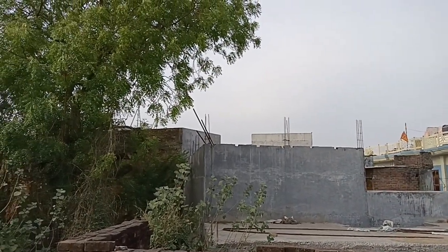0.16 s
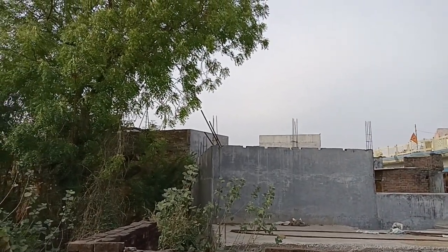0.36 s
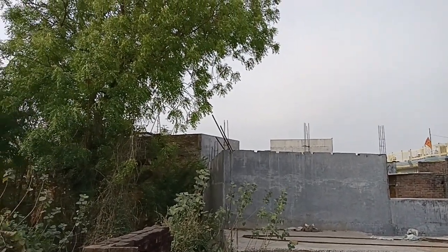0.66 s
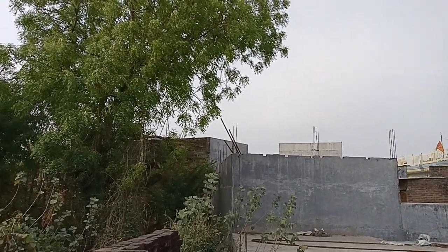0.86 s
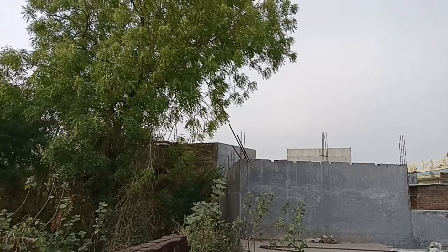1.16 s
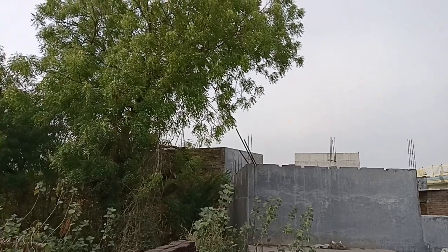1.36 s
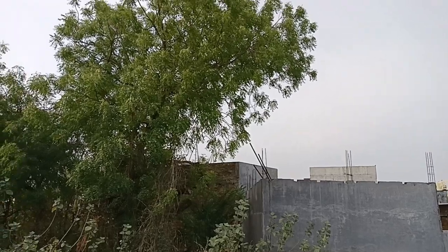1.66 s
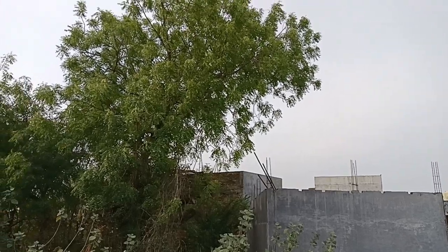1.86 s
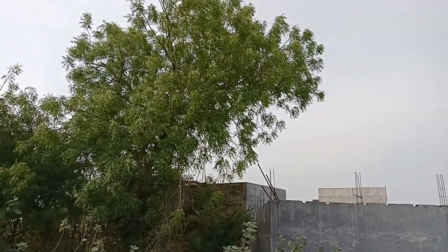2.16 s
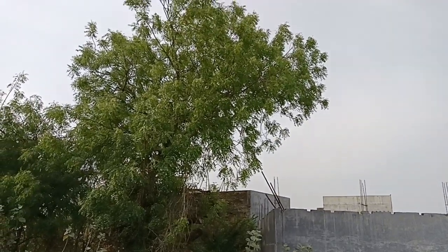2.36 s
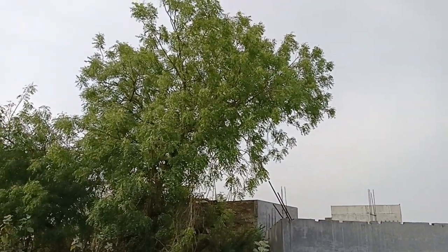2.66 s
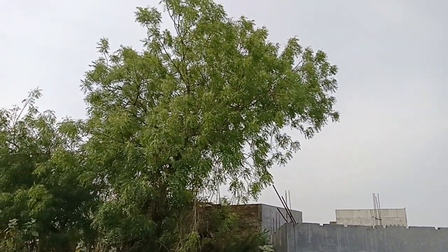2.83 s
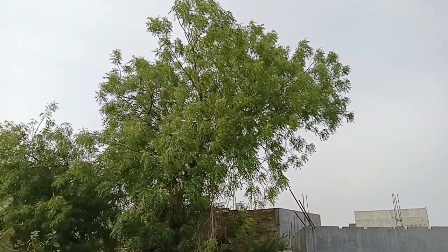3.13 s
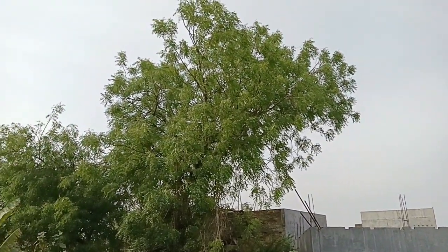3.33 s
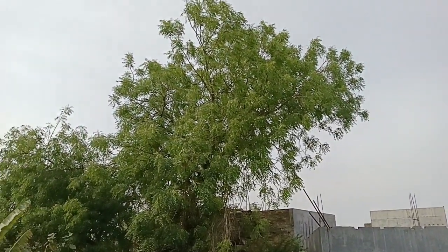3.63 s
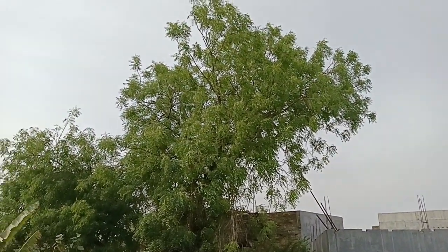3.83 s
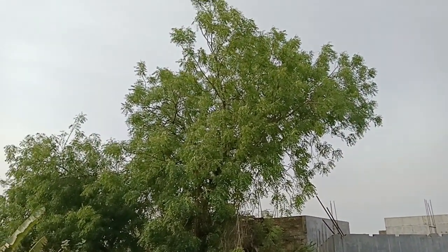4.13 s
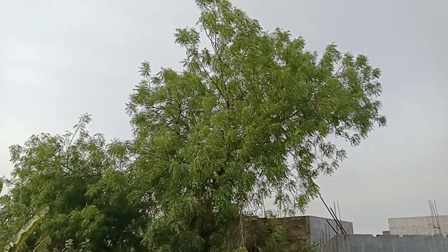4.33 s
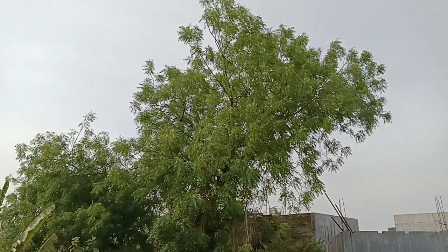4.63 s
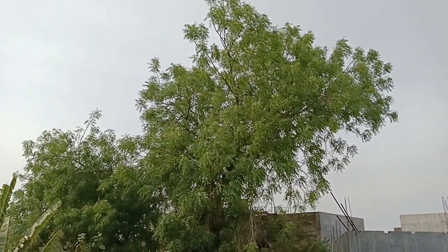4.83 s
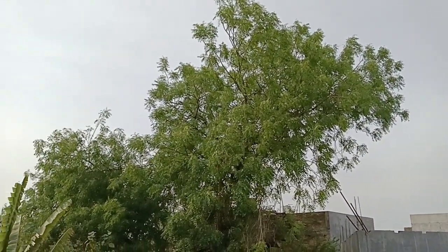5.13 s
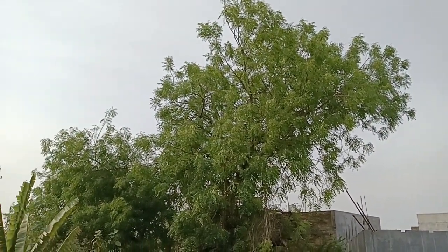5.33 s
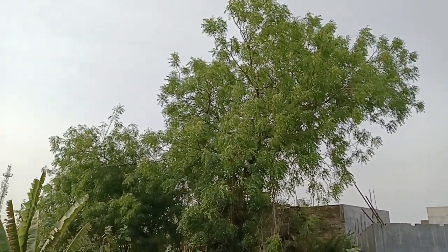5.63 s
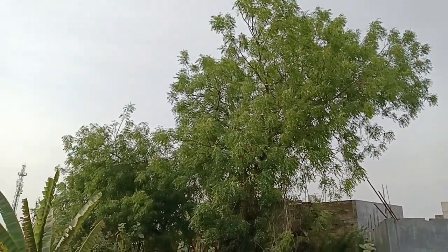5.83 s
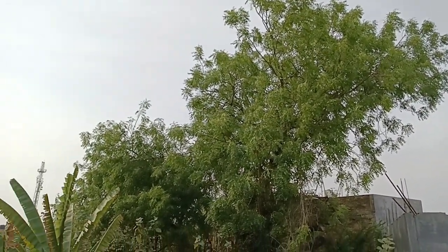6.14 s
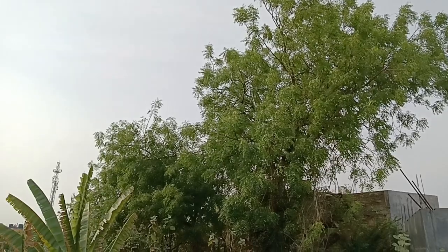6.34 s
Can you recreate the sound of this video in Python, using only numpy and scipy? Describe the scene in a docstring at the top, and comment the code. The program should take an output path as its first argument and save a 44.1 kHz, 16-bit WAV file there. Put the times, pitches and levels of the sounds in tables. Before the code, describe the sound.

A koel whistles four loud rising "ku-oo" calls from leafy trees among houses, while small birds chirp thinly and far horns buzz briefly.

```python
"""A tree among houses: a koel gives four loud "ku-oo" whistles after the end of an earlier one.
Its near-pure tone carries weak overtones shaped by the throat; leaves scatter it, walls throw it back.
Small birds chip, chirp and pipe thinly as swept or trilled tones; two vehicle horns buzz far off.
Under them lies a quiet town rumble of filtered noise, with soft low gusts and handling rubs at the
microphone, two faint hoots and a brief dry crackle of noise bursts."""
import sys
import numpy as np
from scipy import signal
from scipy.fft import rfft, irfft, next_fast_len
from scipy.io import wavfile
from scipy.ndimage import uniform_filter1d, map_coordinates

SR = 44100
rng = np.random.default_rng(int(sys.argv[2]) if len(sys.argv) > 2 else 0)


def output_pcm(signal):
    """Save a mono or channel-first signal as 16-bit PCM at the path in sys.argv[1].

    Samples are clipped to [-1, 1] before scaling.
    """
    pcm = np.clip(np.atleast_2d(signal).T, -1, 1) * 32767
    wavfile.write(sys.argv[1], SR, np.round(pcm).astype(np.int16))


N = 286246
LEAD = SR  # samples of run-up, so that earlier sounds still ring
TOTAL = next_fast_len(N + LEAD, True)


def gain_of(db):
    """Decibel law: level to amplitude ratio."""
    return 10 ** (np.asarray(db) / 20)


def evened(x):
    """Power normalisation: scales to rms 1."""
    return x / np.sqrt(np.mean(x ** 2) + 1e-20)


def read(points, hz):
    """Spectral interpolation on a log-frequency axis."""
    f, value = np.transpose(points)
    return np.interp(np.log(np.maximum(hz, 1e-3)), np.log(f), value)


def follow(rows, t):
    """Control-curve interpolation: each column at times t, with its corners rounded."""
    s, *columns = np.transpose(rows)
    return [uniform_filter1d(np.interp(t, s, c), size=400) for c in columns]


def wander(size, hz):
    """Band-limited random fluctuation: a smooth curve through hz unit-variance knots a second."""
    knots = rng.standard_normal(2048)
    return map_coordinates(knots, [np.arange(size) * hz / SR], order=3, mode="wrap")


def phase_of(hz):
    """Phase as the time integral of frequency."""
    return 2 * np.pi * np.cumsum(hz) / SR


def coloured(x, points):
    """Linear filtering by a magnitude spectrum."""
    hz = np.fft.rfftfreq(x.shape[-1], 1 / SR)
    return irfft(rfft(x) * gain_of(read(points, hz)), x.shape[-1])


def panned(lean_db):
    """Interaural level difference: left and right gains, positive to the left."""
    return gain_of(np.array([[.5], [-.5]]) * lean_db)


def from_right(x, lag_s=0.00046):
    """Interaural time difference: a source on the right reaches the left port later."""
    return np.array([np.roll(x, round(lag_s * SR)), x])


def add(mix, s, sound):
    """Superposition: mixes a sound in at time s."""
    part = mix[..., LEAD + round(s * SR):][..., :sound.shape[-1]]
    part += sound[..., :part.shape[-1]]


def foliage(x, spread_s=0.01):
    """Multiple scattering: leaves and branches give a short cluster of echoes, unlike at each port."""
    t = np.arange(SR // 12) / SR
    taps = rng.standard_normal((2, len(t))) * np.exp(-t / spread_s)
    # keeping only the phase smears the sound with little colouring
    flat = np.exp(1j * np.angle(rfft(taps, len(t) * 4)))
    return signal.fftconvolve(np.atleast_2d(x), irfft(flat)[:, :len(t)], axes=1)[:, :TOTAL]


# reverberation time of the yard, before each source's scaling: pitch_hz, t60_s
YARD_DECAY = [(400, .7), (1000, .85), (1500, 1.05), (3000, .68), (6000, .56), (12000, .45)]
# colour of the reverberation: pitch_hz, level_db
YARD_COLOUR = [(500, 0.5), (1400, 0.5), (3000, -1.5), (6000, 3.5), (12000, 1.5)]


def yard(x, longer=1.0, build_s=0.006):
    """Diffuse reverberation from leaves and houses: sparse taps, each band dying at its own speed."""
    size = SR * 3 // 2
    taps = rng.standard_normal((2, size)) * (rng.random((2, size)) < .1)
    hz, t, bands = signal.stft(taps, SR, nperseg=256)
    t60_s = longer * read(YARD_DECAY, hz)[:, None]
    fade = gain_of(-60 * t / t60_s) * (1 - np.exp(-t / build_s))
    fade /= np.sqrt((fade ** 2).mean(1, keepdims=True))
    shaped = bands * fade * gain_of(read(YARD_COLOUR, hz))[:, None]
    tail = signal.istft(shaped, SR, nperseg=256)[1] / np.linalg.norm(taps[0])
    return signal.fftconvolve(np.atleast_2d(x), tail, axes=1)[:, :TOTAL]


# spectrum of the town background: pitch_hz, relative level_db
TOWN_COLOUR = [(25, -26), (50, -7), (75, 0), (130, -0.5), (250, -2), (450, -7), (800, -11.5), (1500, -17),
               (2500, -14.5), (4000, -28), (6000, -30), (8000, -44), (15000, -44.5)]
# left-right likeness of the background: pitch_hz, correlation (share)
TOWN_LIKENESS = [(50, 0.85), (200, .93), (400, 0.76), (900, 0.33), (2000, 0.31), (8000, 0.014)]
TOWN_DB = -68.5


def town(swell_db=-0.12):
    """Spatial coherence: far traffic and leaves as noise, most alike at both ports in the bass."""
    a, b = rfft(rng.standard_normal((2, TOTAL)))
    same = np.clip(read(TOWN_LIKENESS, np.fft.rfftfreq(TOTAL, 1 / SR)), -1, 1)
    pair = irfft(np.array([a, same * a + np.sqrt(1 - same ** 2) * b]), TOTAL)
    return evened(coloured(pair, TOWN_COLOUR)) * gain_of(TOWN_DB + swell_db * wander(TOTAL, 17))


# colour that throat and beak give the overtones: pitch_hz, level_db
THROAT_RESONANCE = [(2000, 4.5), (2700, -8), (3100, 5), (3900, -20.5), (4300, -13), (4750, 1.5),
                    (5200, -13), (5700, 3), (6400, -5), (7000, -3), (7700, -2), (8500, -20), (9300, -7),
                    (10300, 0.5), (11200, -7.5), (12000, -15), (15000, -14)]
# syrinx tension in every call, before stretching: time_s,
# tension (1 at the crest, 0 on the held note, -1 low in the fall)
SYRINX_TENSION = [(0, -.15), (.01, .3), (.022, .56), (.04, .43), (.06, .25), (.09, .11), (.16, 0),
                  (.21, .06), (.245, .26), (.28, .62), (.31, .91), (.335, 1), (.36, .88), (.38, .48),
                  (.403, 0), (.43, -.44), (.5, -1), (.555, -1.45)]
# how hard the call is blown, before stretching: time_s, fundamental_db, overtones_db
BLOWING_EFFORT = [(0, -19.5, -7.5), (.014, -8, 5.5), (.03, 1, -0.5), (.1, -1, -4.5), (.22, -1.5, -4),
                  (.275, 1.5, -1.5), (.345, -2, 2.5), (.38, -0.5, -0.5), (.43, -9, -9), (.48, -14.5, -15),
                  (.555, -31.5, -28)]
# moments of the opening "ku", the held note and the arched "oo", before stretching: time_s
PART_TIMES = [.05, 0.14, 0.25]


def koel_call(start, length, stretch, held_hz, crest_hz, low_hz, ku_db, held_db, oo_db, over_db,
              rolloff_db, lean_db, strain_db=-0.26, dull_db=-5, open_s=0.028, jitter=0.002,
              flicker_db=4.0, rasp_db=-26, rasp_s=0.018):
    """Source-filter voice: a whistle dips, arches and falls; overtones sweep the throat resonances."""
    t = np.arange(0, length, 1 / SR)
    call_s = t / stretch
    tension, = follow(SYRINX_TENSION, call_s)
    tone_db, bright_db = follow(BLOWING_EFFORT, call_s)
    tone_db = tone_db + np.interp(call_s, PART_TIMES, [ku_db, held_db, oo_db])
    hz = held_hz + tension * np.where(tension > 0, crest_hz - held_hz, held_hz - low_hz)
    phase = phase_of(hz * (1 + jitter * wander(len(t), 400)))
    # the highest overtones speak last and weaken relative to the lower ones as tension rises
    k = np.arange(2, 11)[:, None]
    slope_db = rolloff_db + strain_db * tension + dull_db * np.exp(-t / open_s)
    flicker = flicker_db * np.array([wander(len(t), 35.1) for _ in k])
    weight = gain_of(read(THROAT_RESONANCE, k * hz) + slope_db * k + flicker)
    weight *= gain_of(over_db + bright_db) / np.linalg.norm(weight, axis=0)
    overtones = (weight * np.sin(k * phase)).sum(0)
    voice = np.sqrt(2) * (gain_of(tone_db) * np.sin(phase) + overtones)
    # the syrinx rasps for a moment before it settles into the whistle
    rasp_colour = [(500, -28), (1400, -0.5), (2000, -4.5), (2800, 8.5), (3800, -30.5),
                   (5000, -14.5), (5700, -6.5), (7500, -24.0), (15000, -47.5)]
    rasp = evened(coloured(rng.standard_normal(len(t)), rasp_colour))
    voice += rasp * gain_of(ku_db + rasp_db) * np.exp(-t / rasp_s)
    return start, voice * signal.windows.tukey(len(t), .035) * panned(lean_db)


# koel calls, before the mixing gains: start_s, length_s, time stretch (ratio), held_hz, crest_hz,
# low_hz, ku_db, held_db, oo_db, overtones_db, slope_db per harmonic number, left-right_db
CALLS = [(-.45, 0.55, 1.05, 1302, 1470, 1008, -33, -26, -29, -52, -2, 4),
         (1.052, 0.53, 1.039, 1297, 1487, 995, -26.5, -39, -24.5, -55.5, -1.86, 5),
         (2.569, .535, 0.98, 1365, 1543, 1010, -28, -20.5, -22, -50.5, -2, 6.5),
         (4.168, .515, 1, 1380, 1549, 1019, -24.5, -28, -23, -49, -2, 6),
         (5.612, 0.54, 1.028, 1418, 1629, 1046, -23.5, -24.5, -22, -49.5, -1.96, 5.5)]
# lean of the voice, its treble to the left port: pitch_hz, left-right_db
VOICE_LEAN = [(1500, -1), (3000, -1.5), (5500, -3.5), (7200, -2.5), (9500, 8), (14000, 3.5)]
# echoes from walls and roofs: delay_s, left_db, right_db
WALL_ECHOES = [(.0085, -26, -14), (0.05, -19, -14), (0.069, -3, -17.5), (0.0685, -20.5, -3),
               (0.094, -18.5, -22.5), (0.147, -31, -29.5)]


def koel(direct_db=-1, echo_db=-2.17, leaves_db=-12, wet_db=-10):
    """Direct sound, scattering, specular echoes off walls, and the yard's reverberation."""
    voice, echoes = np.zeros((2, 2, TOTAL))
    for row in CALLS:
        add(voice, *koel_call(*row))
    lean = panned(read(VOICE_LEAN, np.fft.rfftfreq(TOTAL, 1 / SR)))
    voice = irfft(rfft(voice) * lean, TOTAL)
    for delay, left_db, right_db in WALL_ECHOES:
        echoes += gain_of([[left_db], [right_db]]) * np.roll(voice, round(delay * SR), axis=1)
    echoes = coloured(echoes, [(1100, 5), (1400, -3.5), (3000, 0), (6000, -11.5), (12000, -11)])
    # leaves scatter the short waves most, and more toward the right port
    scattered = coloured(foliage(voice, spread_s=0.014), [(1500, -2), (3000, 16.0), (12000, 11)])
    leaves = gain_of(leaves_db) * panned(-7) * scattered
    tail = gain_of(wet_db) * panned(1) * yard(voice.mean(0))
    return gain_of(direct_db) * voice + leaves + gain_of(echo_db) * echoes + tail


# far horns, before the mixing gains: start_s, length_s, pitch_hz, level_db,
# diaphragm resonance_hz, pitch waver (share)
HORN_BLASTS = [(-.08, 0.45, 332.9, -40.5, 2696, 0.0037), (1.149, 0.3, 412.2, -48.5, 3425, 0.0078),
               (1.38, .22, 408.7, -45, 3476, .009), (1.62, .21, 407, -51, 3420, 0.0096)]
# horn colour around the diaphragm resonance: frequency over the resonance (ratio), level_db
DIAPHRAGM_COLOUR = [(.115, -7.5), (.125, -16), (.25, -40), (.45, -37.5), (.62, -24.5), (.7, -8),
                    (.76, -45.5), (.87, -10), (1, 4), (1.05, 5.5), (1.12, -9.5), (1.16, -21), (1.25, -7.5),
                    (1.27, -34), (1.37, -18), (1.5, -21), (1.6, -44.5), (2.1, -40.5), (3.5, -62.5)]


def horns(lean_db=2, direct_db=-2, wet_db=-2, flutter_db=3):
    """Forced resonance of buzzing diaphragms; moving air and the streets make each partial flutter."""
    out, k = np.zeros(TOTAL), np.arange(1, 25)[:, None]
    for s, length, hz, db, ring_hz, waver in HORN_BLASTS:
        size = round(length * SR)
        phase = phase_of(hz * (1 + waver * wander(size, 130)))
        flutter = flutter_db * np.array([wander(size, 20) for _ in k])
        weight = gain_of(read(DIAPHRAGM_COLOUR, k * hz / ring_hz) + flutter)
        tone = evened((weight * np.sin(k * phase)).sum(0))
        add(out, s, gain_of(db) * tone * signal.windows.tukey(size, .4))
    # the streets favour the upper partials in the tail
    ringing = yard(coloured(out, [(400, -9), (2000, -1.5)]), longer=1.41)
    direct = foliage(out, spread_s=0.018)
    return panned(lean_db) * (gain_of(direct_db) * direct + gain_of(wet_db) * ringing)


# a distant bird's thin note, repeated steadily
PIPE_HZ = 5120
PIPE_FIRST_S, PIPE_EVERY_S, PIPE_LENGTH_S = .005, .2472, .125
# the piping fades, grows louder and fades again, before the mixing gains: time_s, level_db
PIPE_LOUDNESS = [(0, -58), (.3, -77), (.8, -64), (1.5, -65), (2.3, -60.5), (3.3, -58.5), (4.7, -57),
                 (5.4, -60.5), (6.4, -63)]


def pipes(trill_hz=110, depth=.022, lean_db=-3, direct_db=-3, wet_db=-2):
    """Frequency modulation: a thin trilled note, repeated far away and heard by scatter."""
    out, t = np.zeros(TOTAL), np.arange(0, PIPE_LENGTH_S, 1 / SR)
    for s in np.arange(PIPE_FIRST_S, N / SR, PIPE_EVERY_S):
        db = np.interp(s, *np.transpose(PIPE_LOUDNESS))
        trill = depth * np.sin(2 * np.pi * trill_hz * t)
        hz = PIPE_HZ * (1 + trill + .012 * wander(len(t), 120))
        add(out, s, gain_of(db) * signal.windows.tukey(len(t), .4) * np.sin(phase_of(hz)))
    scattered = gain_of(direct_db) * foliage(out)
    return panned(lean_db) * (scattered + gain_of(wet_db) * yard(out, longer=0.56))


# buzzy falling chirps, before the mixing gains: start_s, level_db, start_pitch_hz, end_pitch_hz
CHIRP_NOTES = [(0.489, -39, 6056, 5115), (1.692, -40.5, 6046, 5174), (3.138, -48, 6170, 5390),
               (4.755, -53.5, 5630, 5100), (4.78, -49, 3800, 3630), (5.315, -44.5, 5800, 5300),
               (5.532, -55.5, 3090, 2840)]


def chirps(length=0.042, buzz_hz=155, depth=.13, settle=0.73, lean_db=-1, direct_db=-4,
           leaves_db=-6, wet_db=-5, second_db=-28):
    """Fast frequency modulation: falling notes tremble into a buzz, widely at first, deep in leaves."""
    out, u = np.zeros(TOTAL), np.linspace(0, 1, round(length * SR))
    for s, db, start_hz, end_hz in CHIRP_NOTES:
        buzz = np.sin(phase_of(buzz_hz * (1 + 0.15 * wander(len(u), 200))))
        glide = start_hz + (end_hz - start_hz) * u
        phase = phase_of(glide * (1 + depth * (1 - settle * u) * buzz))
        tone = np.sin(phase) + gain_of(second_db) * np.sin(2 * phase)
        add(out, s, gain_of(db) * signal.windows.tukey(len(u), .8) * tone)
    direct = gain_of(direct_db) * from_right(out)
    leaves = gain_of(leaves_db) * foliage(out, spread_s=0.05)
    return panned(lean_db) * (direct + leaves + gain_of(wet_db) * yard(out, longer=0.75))


# a small bird's rising chips, before the mixing gains: start_s, level_db, top_pitch_hz,
# second_harmonic_db
CHIP_NOTES = [(0.692, -47, 4340, -22), (0.722, -45, 4646, -2), (0.773, -46, 4280, -11),
              (0.797, -49.5, 3960, -12), (.859, -51, 3860, 3.5), (.905, -53, 3844, 0.5),
              (0.948, -50, 3890, 0.5), (.996, -53, 3930, 2.5), (1.217, -45, 4520, -5),
              (2.02, -54.5, 4310, -19), (2.118, -48, 4144, -21.5), (3.155, -50, 4370, -26),
              (3.498, -50, 4280, -25.5), (3.577, -45, 4230, -26), (3.711, -47, 4168, -25),
              (4.862, -47.5, 4250, -23), (4.944, -45.5, 4160, -24), (5.417, -50.5, 4360, -14),
              (5.519, -46, 4220, -30), (6.074, -51.5, 4300, -13), (6.181, -48, 4240, -27),
              (6.225, -56, 4215, -21)]


def chips(length=.009, rise=0.24, lean_db=-4, direct_db=2, leaves_db=-5, wet_db=-1.5,
          echo_s=0.076, echo_db=-10, upper_ratio=1.6, upper_db=-12, fourth_db=-20):
    """Rapid upward sweep with harmonics, blurred by leaf scattering and answered by a wall."""
    out, u = np.zeros(TOTAL), np.linspace(0, 1, round(length * SR))
    for s, db, top_hz, second_db in CHIP_NOTES:
        phase = phase_of(top_hz * (1 - rise * (1 - u) ** 2 + 0.004 * wander(len(u), 830)))
        upper = gain_of(upper_db) * np.sin(upper_ratio * phase)  # second voice of the syrinx
        # fourth_db is relative to the second harmonic
        even = gain_of(second_db) * (np.sin(2 * phase) + gain_of(fourth_db) * np.sin(4 * phase))
        add(out, s, gain_of(db) * np.sin(np.pi * u) * (np.sin(phase) + even + upper))
    # the upper partials arrive mostly by scatter
    direct = from_right(coloured(out, [(4500, -2.5), (7000, -6.5)]))
    direct += gain_of(echo_db) * np.roll(direct, round(echo_s * SR), axis=1)
    leaves = gain_of(leaves_db) * foliage(out, spread_s=0.025)
    tail = gain_of(wet_db) * yard(out, longer=0.59)
    return panned(lean_db) * (gain_of(direct_db) * direct + leaves + tail)


# soft low gusts and handling rubs at the microphone: peak_s, width_s, level_db, centre_hz
GUSTS_AND_RUBS = [(2.769, 0.053, -61, 200), (4.42, 0.1, -72, 220), (5.27, 0.09, -64.5, 75),
                  (5.521, .15, -65, 74.8), (5.85, .06, -62.5, 120), (6.079, 0.19, -60.5, 70.8),
                  (6.449, 0.069, -65, 69.5)]
# colour of a gust or rub: frequency over its centre (ratio), level_db
BURST_COLOUR = [(.27, -34.5), (.6, -11), (1, 1), (1.87, -6), (3.3, -26), (8, -30), (40, -67)]


def gusts_and_rubs(unlike=0.44):
    """Low noise bursts: soft gusts and rubs swell and fade, partly shared by the two ports."""
    out, t = np.zeros((2, TOTAL)), np.arange(SR) / SR - .5
    for s, width, db, centre_hz in GUSTS_AND_RUBS:
        noise = rng.standard_normal(SR) + unlike * rng.standard_normal((2, SR))
        burst = evened(coloured(noise, [(ratio * centre_hz, level) for ratio, level in BURST_COLOUR]))
        add(out, s + t[0], burst * gain_of(db) * np.exp(-(t / width) ** 2))
    return out


# faint far hoots, before the mixing gains: start_s, length_s, pitch_hz, level_db
HOOT_NOTES = [(4.0, 0.15, 499, -69), (5.163, 0.047, 612.7, -58.5)]


def hoots():
    """Simple harmonic oscillation: soft low tones from far away, with reverberation."""
    out = np.zeros(TOTAL)
    for s, length, hz, db in HOOT_NOTES:
        t = np.arange(round(length * SR)) / SR
        add(out, s, gain_of(db) * signal.windows.tukey(len(t), .5) * np.sin(2 * np.pi * hz * t))
    return gain_of(-2.5) * out + yard(out, longer=0.93)


# a brief dry crackle close by, before colour and panning: start_s, level_db
SNAPS = [(5.448, -44.5), (5.451, -47), (5.459, -50), (5.483, -58), (5.487, -57), (5.495, -47.5),
         (5.509, -56.5)]


def crackle(snap_s=.0012, rustle_db=-17, rustle_s=0.055, lean_db=4):
    """Impulsive noise with two decay rates: tiny bright snaps, each with a short rustle after it."""
    out, t = np.zeros((2, TOTAL)), np.arange(SR // 6) / SR
    decay = np.exp(-t / snap_s) + gain_of(rustle_db) * np.exp(-t / rustle_s)
    for s, db in SNAPS:
        add(out, s, gain_of(db) * rng.standard_normal((2, len(t))) * decay)
    colour = [(200, -25), (1500, -3.0), (3000, 6), (6000, -3), (12000, 4.0), (16000, -6.0)]
    return panned(lean_db) * coloured(out, colour)


def scene():
    """Superposition of all sources, with the run-up dropped."""
    birds = koel() + pipes() + chirps() + chips()
    mix = town() + birds + horns() + gusts_and_rubs() + hoots() + crackle()
    return mix[:, LEAD:LEAD + N]


EDGE_HZ = 15750


def record(dry):
    """Band limitation: the recorder's linear-phase low-pass filter."""
    lowpass = signal.firwin(511, EDGE_HZ, window=("kaiser", 9), fs=SR)
    return signal.oaconvolve(dry, lowpass[None], "same")


dry = scene()
out = record(dry)
output_pcm(out)
```